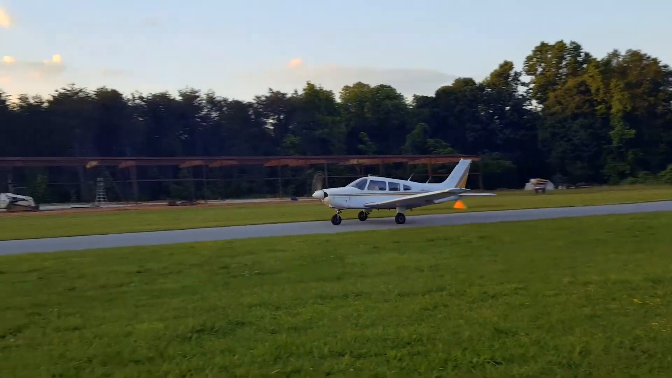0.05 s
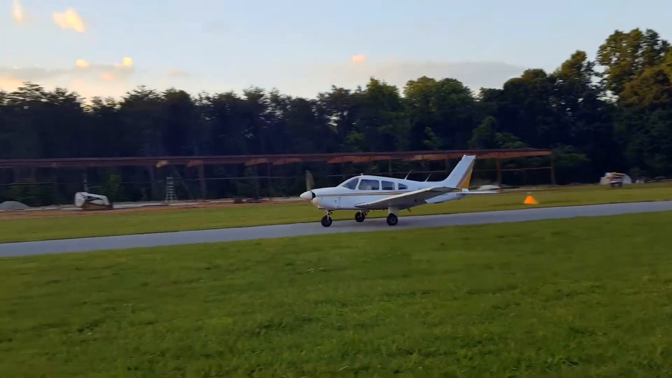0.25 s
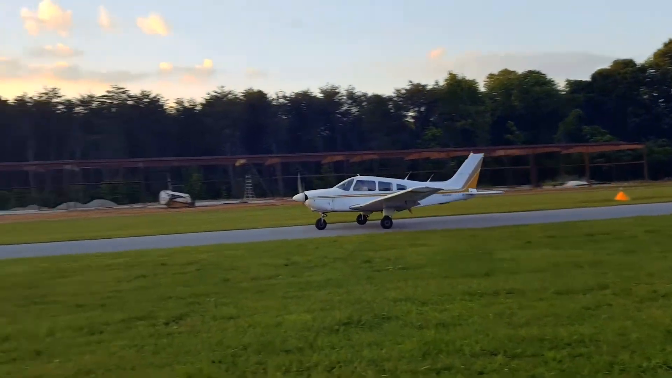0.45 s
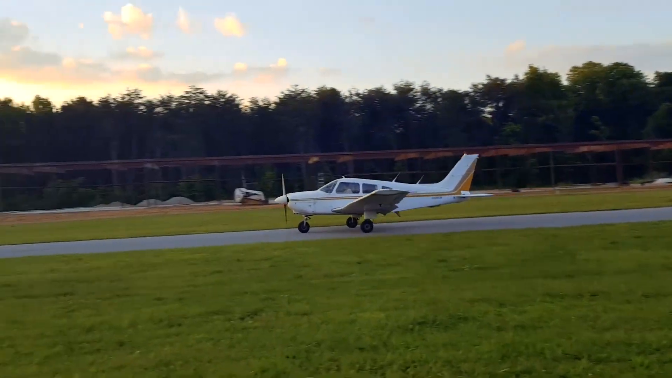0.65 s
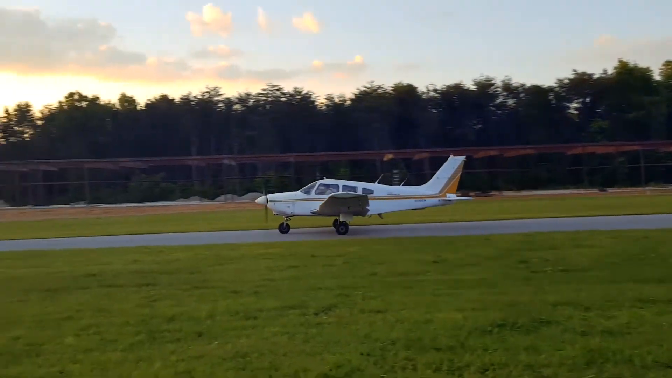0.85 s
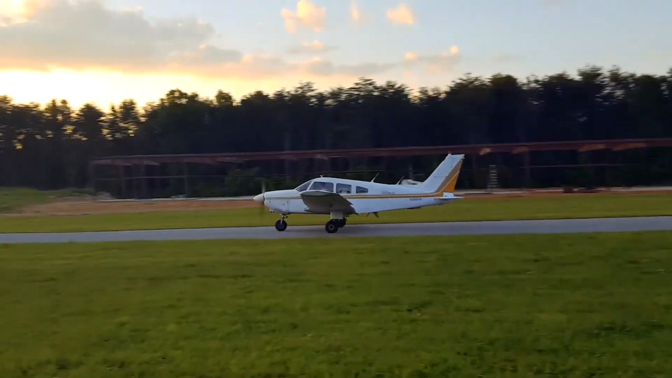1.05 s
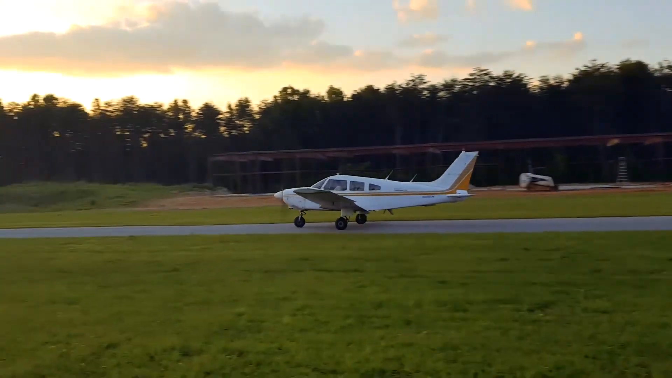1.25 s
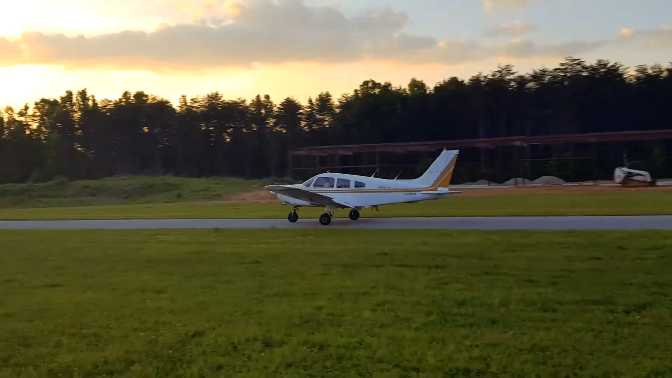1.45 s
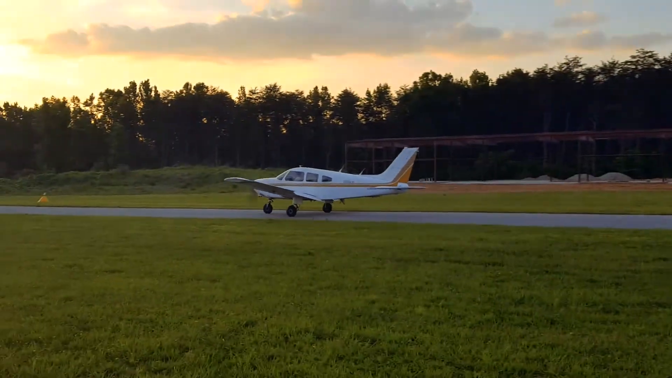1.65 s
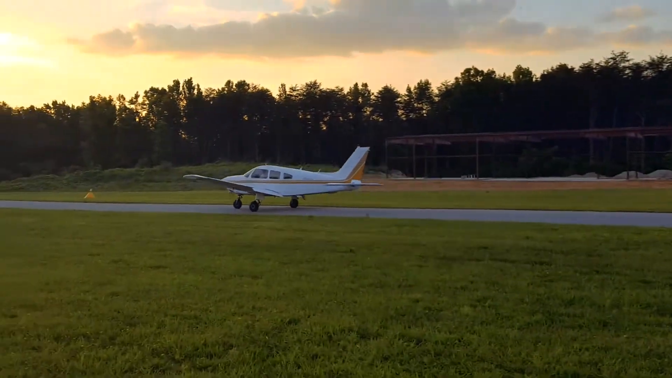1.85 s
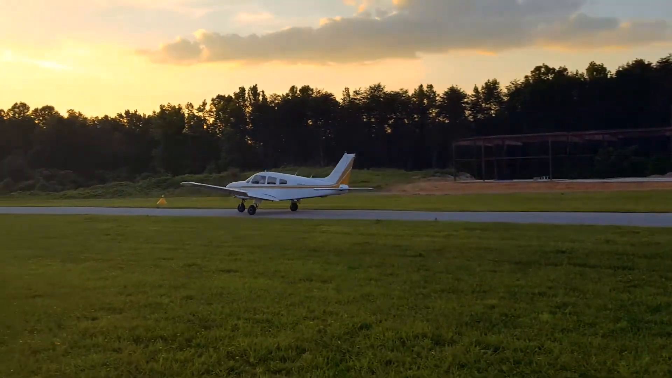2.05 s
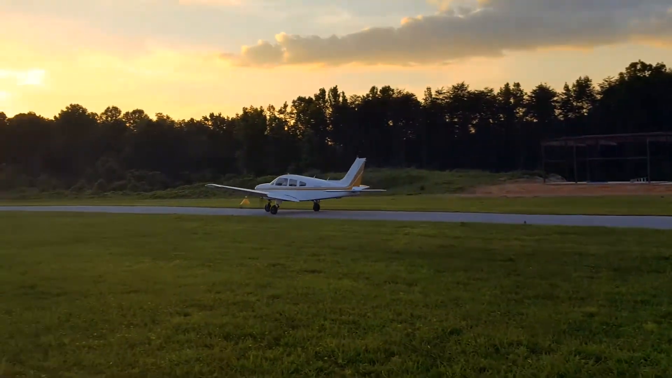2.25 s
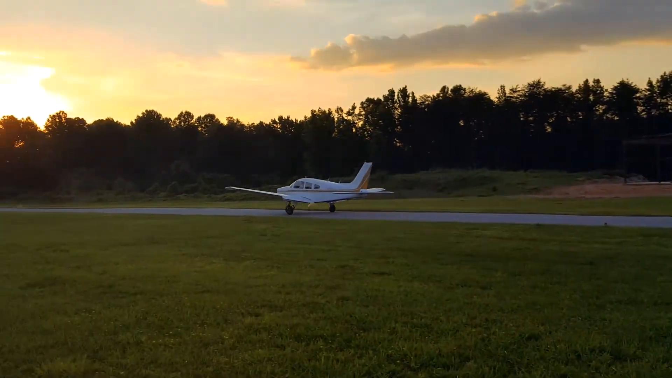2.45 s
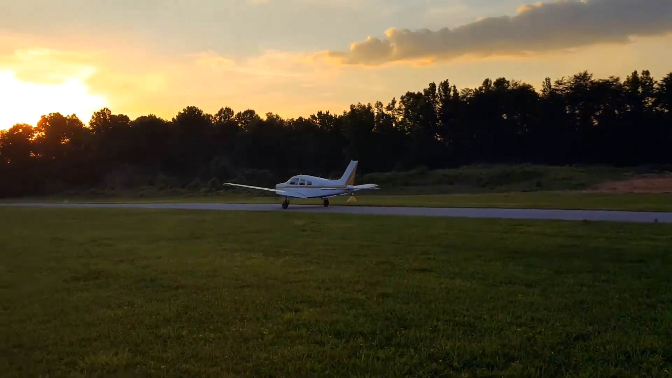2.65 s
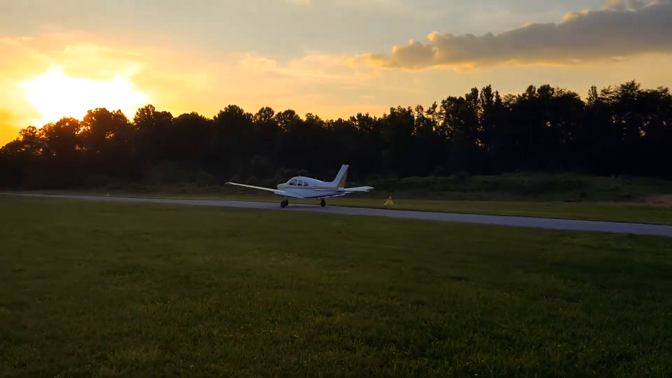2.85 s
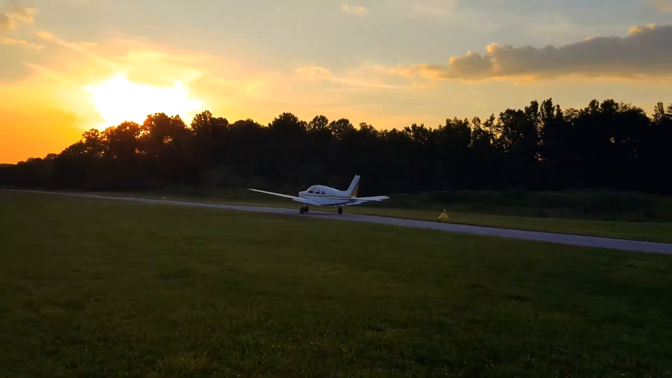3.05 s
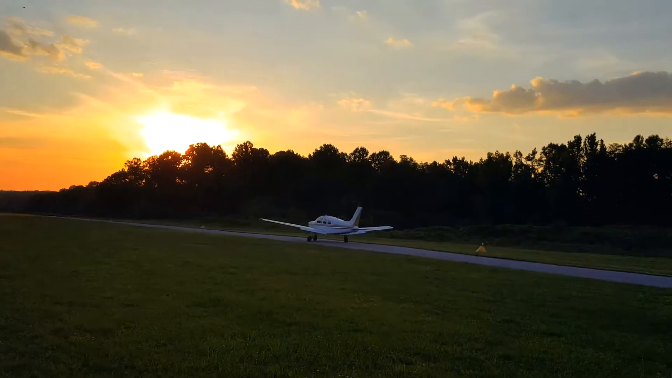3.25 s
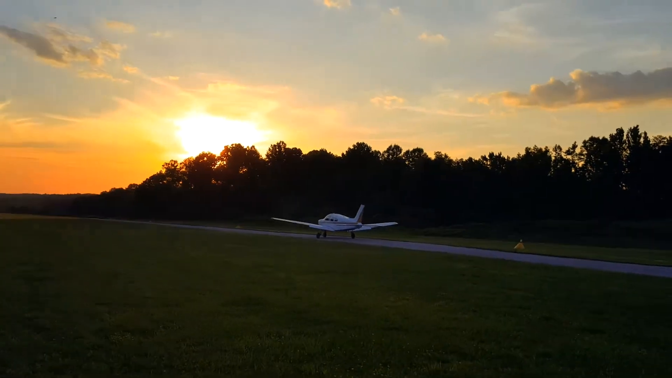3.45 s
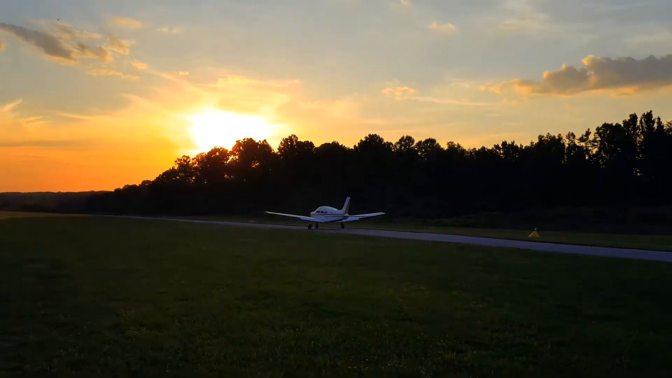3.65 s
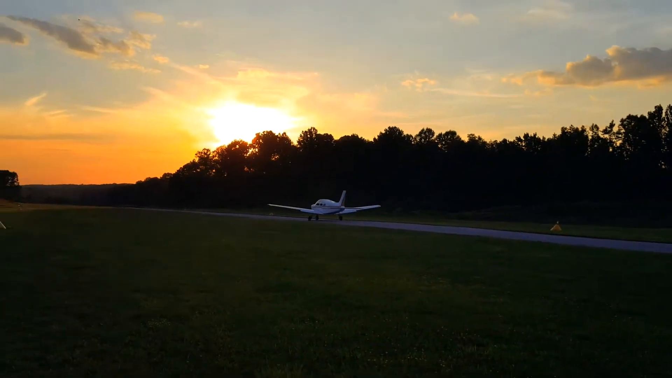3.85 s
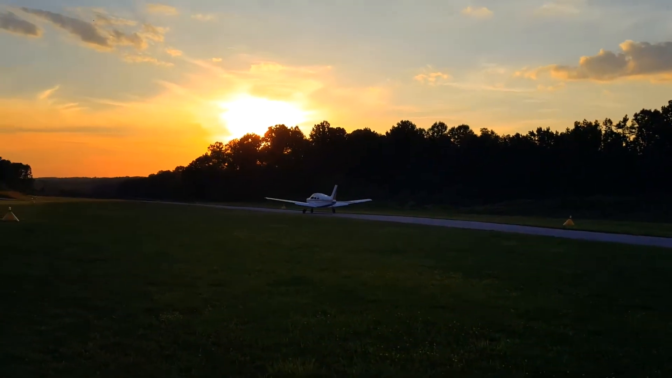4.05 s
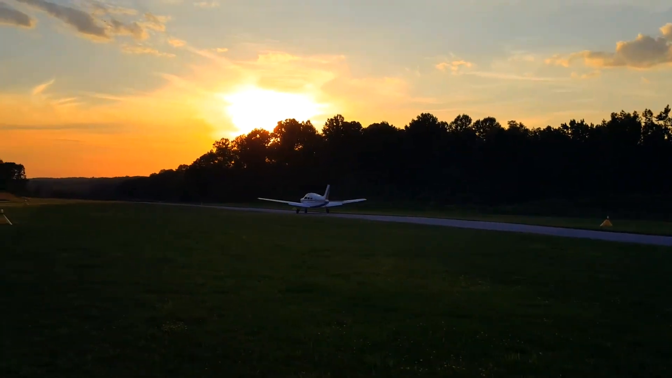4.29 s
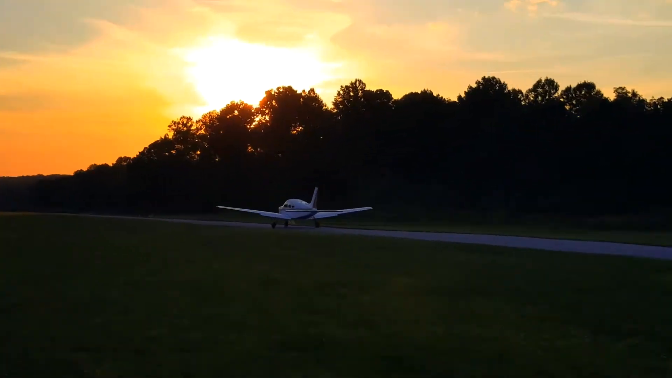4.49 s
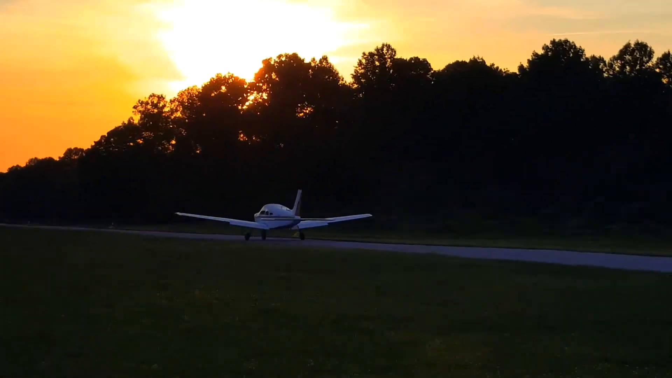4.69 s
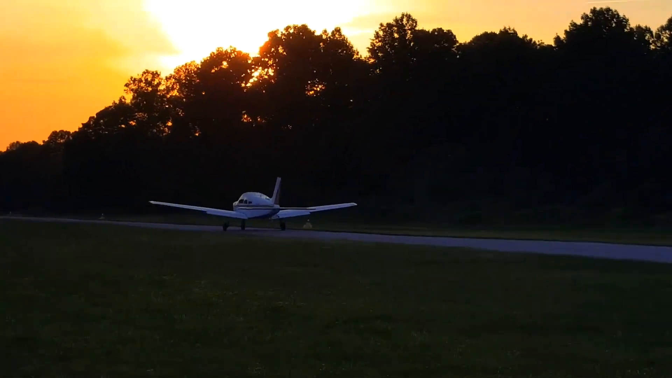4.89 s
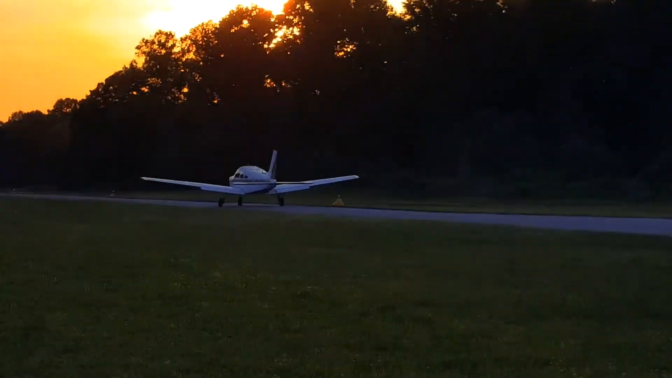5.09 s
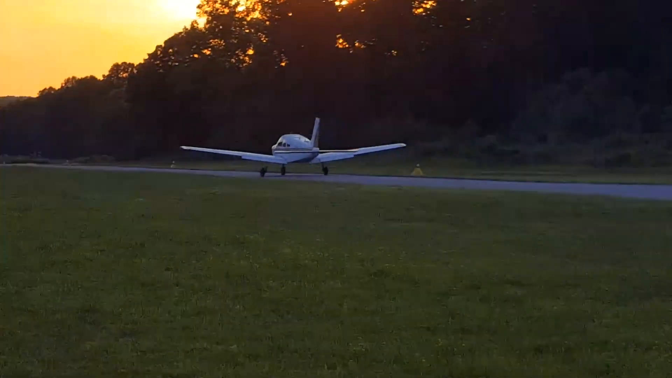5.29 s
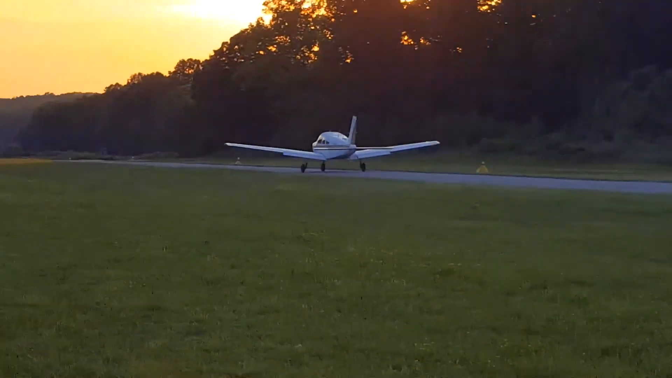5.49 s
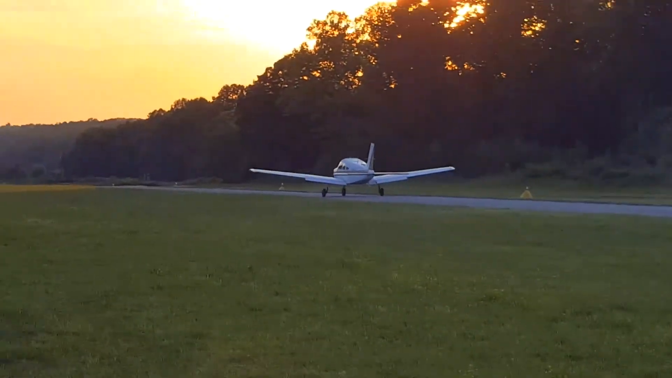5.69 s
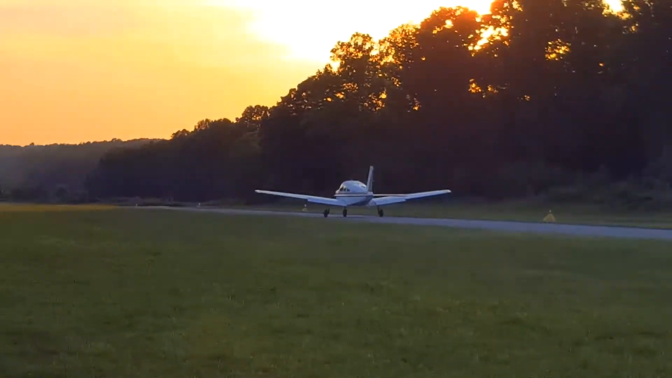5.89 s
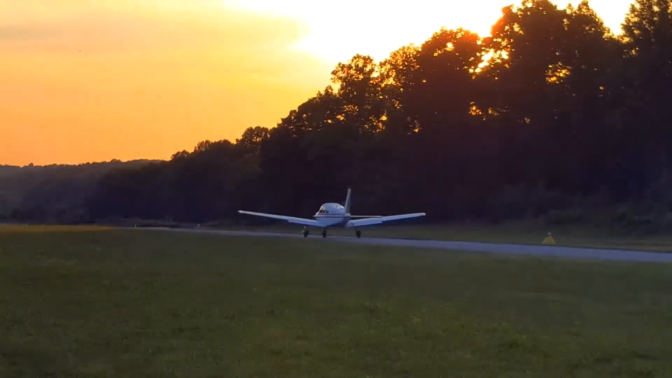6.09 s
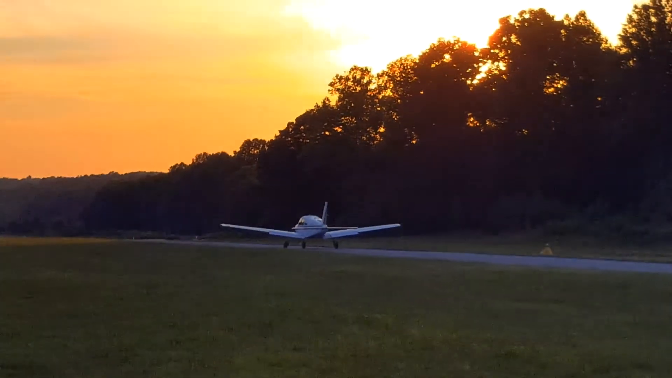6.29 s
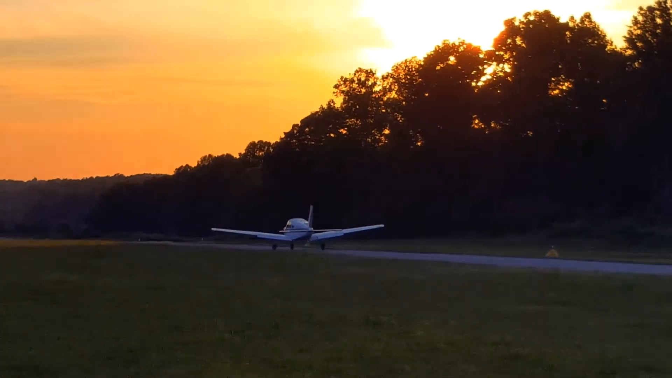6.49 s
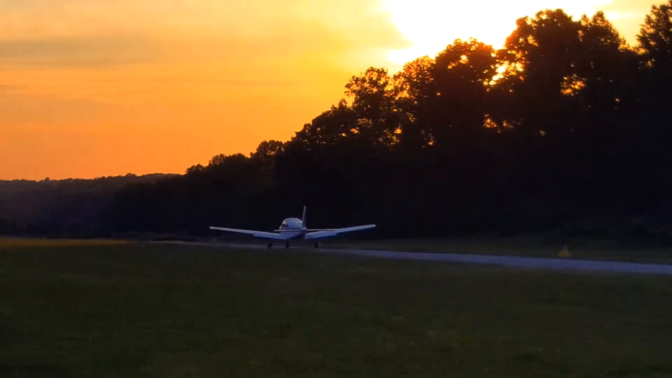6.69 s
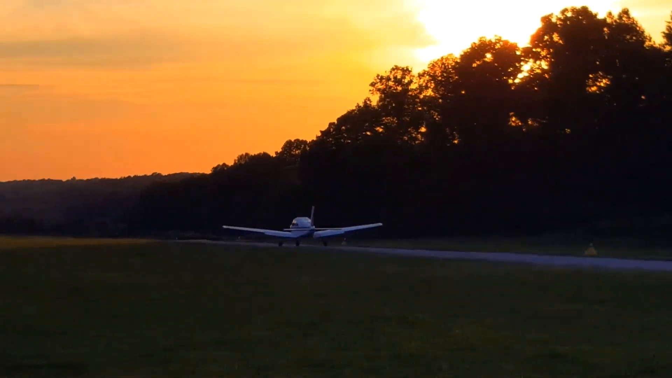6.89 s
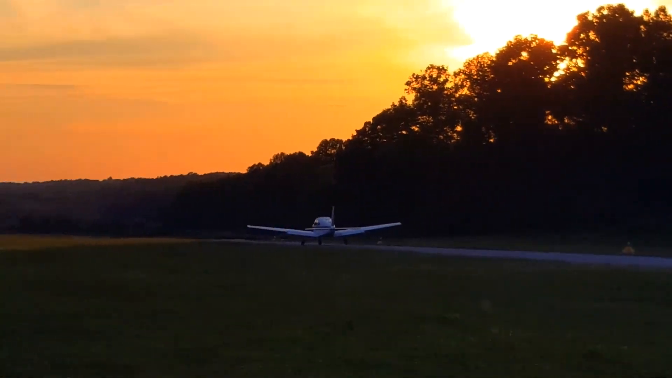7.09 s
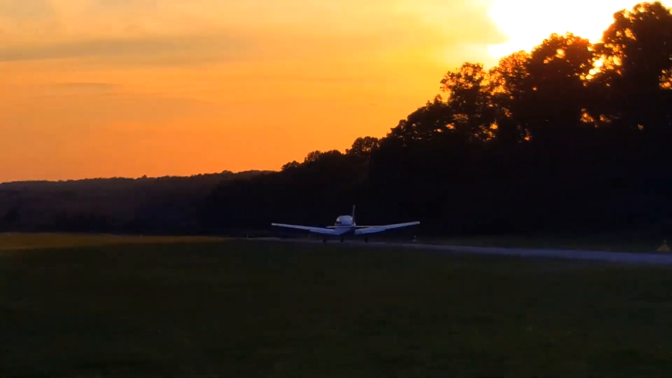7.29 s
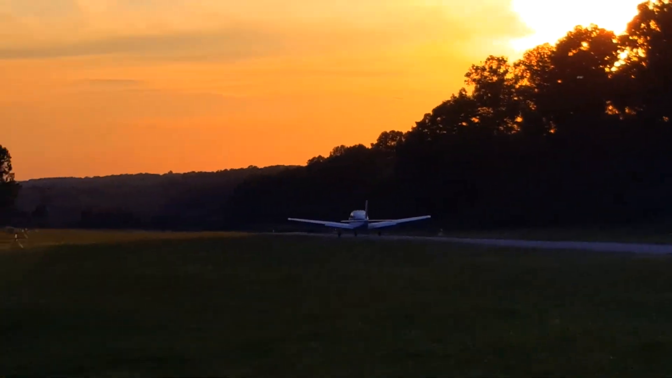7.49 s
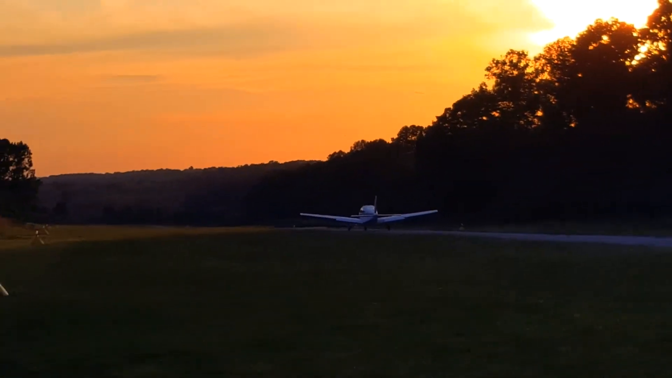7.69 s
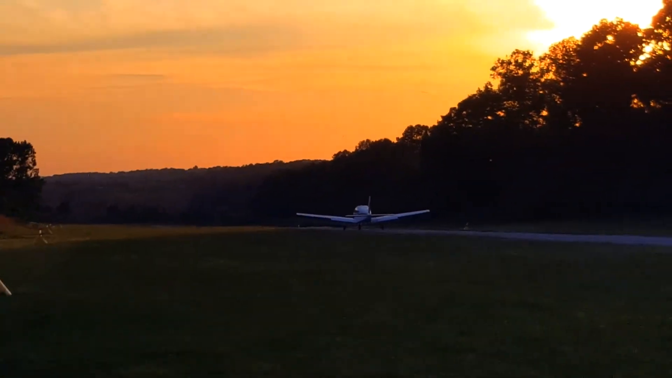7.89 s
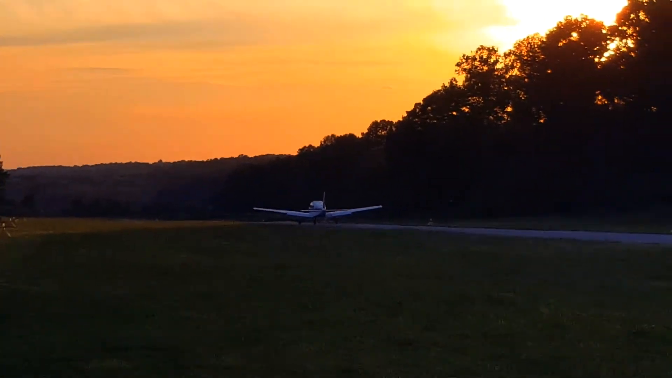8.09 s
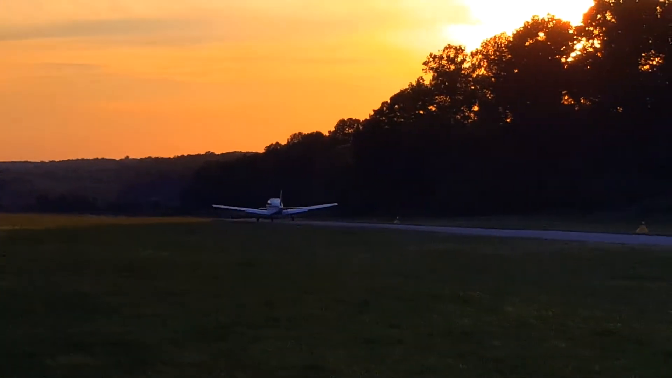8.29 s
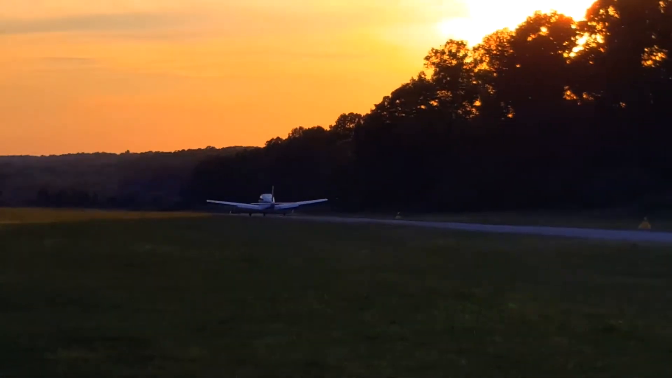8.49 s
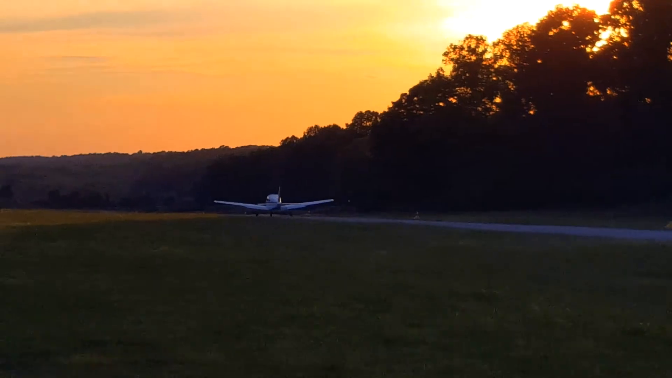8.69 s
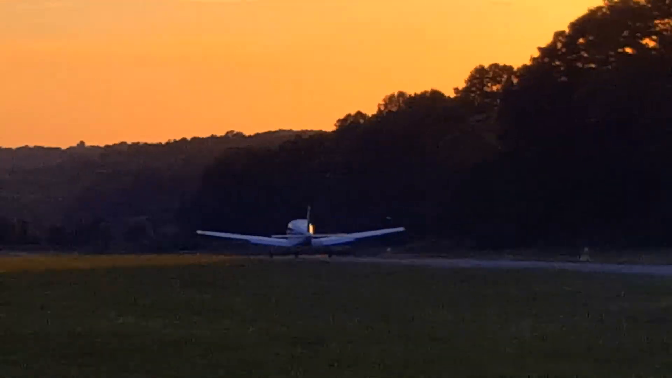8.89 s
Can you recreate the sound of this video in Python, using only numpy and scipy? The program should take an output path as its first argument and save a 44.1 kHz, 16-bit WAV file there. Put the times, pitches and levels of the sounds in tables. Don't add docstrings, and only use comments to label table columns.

```python
import sys
import numpy as np
from scipy import signal
from scipy.fft import rfft, irfft, next_fast_len
from scipy.io import wavfile

SR = 44100
rng = np.random.default_rng(int(sys.argv[2]) if len(sys.argv) > 2 else 0)


def transcribe(signal):
    frames = np.atleast_2d(signal).T
    limited = np.clip(frames, -1, 1)
    pcm = np.round(limited * 32767).astype(np.int16)
    wavfile.write(sys.argv[1], SR, pcm)


def invert_db(level):
    return 10 ** (np.asarray(level, dtype=float) / 20)


N = 394254

# freq_hz, side_minus_mid_db
SIDE_SPECTRUM = [(60, -33), (110, -1.5), (200, -12), (380, -17), (700, -14.5), (1290, -13.5), (2380, -9.5),
                 (4400, -8.5), (8120, -7.5), (15000, -5.5)]
# start_s, level_db
WOODS_ROAR = [(0, -32), (.4, -32), (1, -32.5), (1.5, -32.5), (2.6, -36), (3.8, -30), (4.4, -34.5), (5, -37),
              (6.3, -47), (7, -48.5), (7.7, -55), (8.94, -54.5)]


def rms_one(x):
    return x / np.sqrt(np.mean(x ** 2) + 1e-20)


def to_db(gain):
    return 20 * np.log10(gain + 1e-6)


def in_time(rows):
    s, *columns = np.transpose(rows)
    return [np.interp(np.arange(N) / SR, s, c) for c in columns]


def at_hz(points, hz):
    point_hz, value = np.transpose(points)
    return np.interp(np.log(hz), np.log(point_hz), value)


def axis():
    size = next_fast_len(N)
    return size, np.maximum(np.arange(size // 2 + 1) * SR / size, 1)


def drift(rate_hz):
    r = np.exp(-80 * np.pi * rate_hz / SR)
    slow = signal.lfilter([1], [1, -2 * r, r * r], rng.standard_normal(N // 40 + 2002))
    slow = rms_one(slow[2000:])
    return np.interp(np.arange(N) / 40, np.arange(len(slow)), slow)


def bell(t, centre, width):
    return np.exp(-((t - centre) / width) ** 2 / 2)


def ridge(t, peak_db, centre_s, rise, fall):
    round_s = 0.24
    late_s = t - centre_s
    return peak_db - np.where(late_s < 0, rise, fall) * (np.hypot(late_s, round_s) - round_s)


def to_ports(mid, side, hz):
    # freq_hz, left_minus_right_db
    port_lean = [(60, -0.5), (110, 10), (200, -6), (380, -1.5), (700, -2.5), (1290, 0.5), (2380, -3),
                 (4400, 1.5), (8120, -4), (15000, -0.5)]
    lean = invert_db(at_hz(port_lean, hz) / 2)
    return np.array([(mid + side) * lean, (mid - side) / lean])


def order(k, firings, level_db):
    phase_rad = -1.7 - .36 * k
    return np.sqrt(2) * invert_db(level_db) * np.cos(2 * np.pi * k * firings + phase_rad)


def direct_levels(t):
    # start_s, level_db
    firing_tone = [(0, -37), (.15, -30), (.4, -21.5), (1, -19.5), (1.6, -16.5), (2.1, -15), (2.6, -15.5),
                   (3.3, -17), (4.3, -25), (5.1, -23.5), (6, -28), (7.1, -25.5), (7.8, -31.5), (8.94, -38)]
    # peak_db, peak_s, rise_db_per_s, fall_db_per_s, astern_under_firing_db
    disc_sweep = [
        (-14.5, 1.16, 2, 12.5, -9),
        (-22, 1.29, 4, 25, -26),
        (-28, 0.84, 30, 11.5, -38.5),
        (-32.5, 1.025, 16.5, 66, -39),
    ]
    # order, centre_s, width_s, level_db
    order_swells = [
        (3, 4.15, .3, -37),
        (3, 4.9, .35, -43),
        (5, 1.45, .15, -45),
        (4, 3.85, .45, -38),
        (5, 3.2, .2, -50),
        (4, 5.5, .4, -49),
    ]
    first_db, = in_time(firing_tone)
    levels = [first_db]
    for k, (*sweep, astern_db) in enumerate(disc_sweep, 2):
        passed = (t > sweep[1]) * (1 - bell(t, sweep[1], 0.98))
        lifted_db = 10 * np.clip((t - 6.84) / 1.5, 0, 1) * (k == 2)
        astern = invert_db(first_db + astern_db - lifted_db) * passed
        order_bumps = sum(invert_db(db) * bell(t, s, width) for n, s, width, db in order_swells if n == k)
        levels.append(to_db(invert_db(ridge(t, *sweep)) + astern + order_bumps))
    return levels


def direct_tone(firings):
    t = np.arange(N) / SR
    levels = direct_levels(t)
    sixth_db = np.minimum(levels[4] - 2, -43) - 14 * bell(t, 1.4, .15)
    return sum(order(k, firings, db) for k, db in enumerate(levels + [sixth_db], 1))


def echo_levels(t):
    # centre_s, width_s, order_1_db, order_2_db
    stands = [(2.6, 0.62, -29, -36), (3.42, 0.2, -18, -21), (3.92, 0.24, -17.5, -19),
              (4.4, 0.26, -19.5, -37), (4.88, 0.24, -27.5, -21), (5.32, 0.15, -34, -32.5),
              (5.72, 0.26, -19.5, -31), (6.308, 0.14, -26.5, -33.5), (6.68, 0.1, -39, -40),
              (6.94, 0.096, -28, -47), (7.4, 0.15, -27.5, -42), (7.72, 0.13, -63, -41.5),
              (8.06, 0.19, -29.5, -46), (8.6, 0.18, -47, -43), (8.9, 0.079, -47, -50)]
    # peak_db, peak_s, rise_db_per_s, fall_db_per_s
    third_ridge = (-36, 3.5, 30, 12.5)
    humps = np.array([bell(t, s, width) for s, width, *_ in stands])
    first_db, second_db = to_db(invert_db(np.array(stands)[:, 2:].T) @ humps)
    third_db = ridge(t, *third_ridge)
    return [first_db, second_db, third_db, third_db - 5.5]


def tree_echo(firings, leads):
    levels = echo_levels(np.arange(N) / SR)
    return sum(order(k + 1, firings + leads[min(k, 1)], db) for k, db in enumerate(levels))


def woods_swing():
    return in_time(WOODS_ROAR)[0] + 39


def odd_turns(k):
    # order, centre_s, width_s, level_db
    turn_list = [
        (1.5, 5.26, 0.7, -9),
        (1.5, 1.9, .2, -3),
        (1.5, 7.8, .3, 3),
        (2.5, 4.6, .4, 6),
        (2.5, 2.8, 0.19, 6),
        (2.5, 1.7, 0.27, -6),
        (.5, 5.4, 1.3, -9),
        (3.25, 8, 1.6, -9),
        (2.75, 8.2, 1.2, -6),
    ]
    t = np.arange(N) / SR
    return sum(db * bell(t, s, width) for n, s, width, db in turn_list if abs(n - k) < .1)


def imbalance_orders(firings):
    # order, level_db
    uneven = [(0.502, -13), (1.247, -4), (1.5, 2), (1.748, -4.5), (2.25, 1.5), (2.5, -3), (2.75, -5.5),
              (3.25, -4.5), (3.499, -39)]
    t = np.arange(N) / SR
    level_db = -39 + 0.68 * woods_swing() - 7.5 / (1 + np.exp((t - 2.3) / 0.08))
    out = 0
    for k, db in uneven:
        sway = 1 if round(4 * k) % 2 == 0 else drift(3.0)
        order_db = level_db + db + odd_turns(k) + 2.0 * drift(5.0)
        out = out + sway * order(k, firings + rng.random(), order_db)
    return out


def upper_orders(firings):
    # order, level_db
    upper = [(7, 2), (8, 2), (9, 1), (10, -3), (11, -4)]
    level_db = -46 - 31 * np.maximum(np.arange(N) / SR - 0.95, 0)
    return sum(order(k, firings, level_db + db + 1.2 * drift(2.5)) for k, db in upper)


def scattered_tone(firings):
    t = np.arange(N) / SR
    shade_db = 9 / (1 + np.exp((t - 2.5) / .3))
    level_db = -39 + woods_swing() - shade_db + 7 * bell(t, 1.35, .15)
    ahead = firings + 3.5 * t
    out = 0
    for k, db in ((2, -7.), (3, -10.), (4, -18.)):
        out = out + drift(1.2 * k) * order(k, ahead, level_db + db)
        out = out + drift(2.3 * k) * order(k, ahead + 0.096 / k, level_db + db)
    return out


def tone(firings, leads):
    # freq_hz, left_minus_right_db
    low_lean = [(75, -.55), (150, -1.1), (230, -1.7)]
    out = direct_tone(firings) + tree_echo(firings, leads) + imbalance_orders(firings)
    out = out + upper_orders(firings) + scattered_tone(firings)
    size, hz = axis()
    port_turn_rad = .05
    turn = invert_db(at_hz(low_lean, hz) / 2) * np.exp(-1j * port_turn_rad)
    return irfft(rfft(out, size) * [turn, 1 / turn] * invert_db(0.7), size)[:, :N]


def bursts(firings, uneven_db, standouts=()):
    count = np.floor(firings + .5).astype(int)
    chance_db = uneven_db * rng.standard_normal(1000)
    for s, db in standouts:
        chance_db[count[round(s * SR)]] = 1.04 * db / 2
    cylinder_db = np.array([0, .3, -.9, .7])
    strength_db = cylinder_db[count % 4] + chance_db[count % 1000]
    angle = 2 * np.pi * firings + .35
    hump = .5 + .5 * np.cos(angle - .4 * (1 - np.cos(angle)))
    return hump, invert_db(2 * strength_db)


def staged_noise():
    # freq_hz, level_db_per_hz
    abeam = [(330, -30), (480, -14), (650, -1.5), (1550, 4), (2330, 5), (3130, -9.5), (4190, -8),
             (5000, -15.5), (5800, -29), (6900, -12.5), (8300, -23.5), (10500, -37), (12300, -38),
             (13300, -41), (15900, -35)]
    quartering = [(330, -30), (480, -8.5), (643, 0.5), (888, -4), (1740, 0), (2450, -1), (3100, -12),
                  (3600, -11), (4070, -12.5), (4600, -15.5), (5100, -19), (6300, -23.5), (7760, -2.5),
                  (9500, -31.5), (12300, -34.5), (13300, -33), (15900, -28)]
    astern = [(330, -36), (480, -11), (862, -9), (1720, 2.5), (2330, 4.5), (3080, -5), (4260, 0),
              (5960, -21.5), (7530, -5), (8100, -17), (8850, -34.5), (10900, -35), (11600, -47),
              (12600, -54), (14300, -45), (15900, -47)]
    far_off = [(330, -26), (480, -18.5), (700, -13.5), (1280, -10.5), (1550, -2.5), (2300, 4), (3130, -6.5),
               (4100, -0.5), (5600, -12), (6500, -15.5), (7600, -15), (9600, -36.5), (11500, -48),
               (15900, -53)]
    lift_off = [(330, -15.5), (480, -16), (700, -11), (1280, -8), (1700, -1), (2300, -1.5), (3130, -8),
                (4100, -5), (5300, -15.5), (6400, -31), (7600, -18.5), (8800, -42.5), (11500, -52),
                (15900, -56)]
    # start_s, colour_in_use (0-4)
    stage_path = [(0, 0), (1.5, 0), (1.75, 1), (3.2, 1), (3.42, 2), (5.62, 2), (5.76, 3), (7.4, 3),
                  (8.1, 4), (8.94, 4)]
    # low_hz, high_hz
    band_edges = [(450, 1200), (1200, 3100), (3100, 5900), (6500, 8800)]
    size, hz = axis()
    white = rfft(rng.standard_normal((2, size)))
    stage = np.clip(in_time(stage_path)[0], 0, 4)
    out, base_db = 0, 0
    for k, points in enumerate((abeam, quartering, astern, far_off, lift_off)):
        share = np.clip(1 - abs(stage - k), 0, 1)
        gain = invert_db(at_hz(points, hz))
        out = out + share * irfft(white * gain, size)[:, :N]
        power = [2 * np.sum(gain[(hz > low) & (hz < high)] ** 2) / size for low, high in band_edges]
        base_db = base_db + share * 10 * np.log10(power)[:, None]
    return rfft(out, size), base_db


def swells(hz):
    # centre_s, width_s, freq_hz, level_db
    swell_list = [(0, 0.18, 7000, -6), (0, 0.49, 14000, 3.5), (0.248, 0.44, 3889, 4), (.5, 0.68, 1650, 5),
                  (1.5, 0.2, 8000, -6), (2.2, 0.36, 2180, 5), (2.4, 0.09, 3889, 4), (2.5, 0.63, 720, -6),
                  (3.25, 0.11, 7500, -3.5), (5.25, .1, 4100, -0.5), (3.5, 0.19, 760, 3.5),
                  (3.6, .5, 2160, -1), (3.4, 0.32, 3900, 1), (3.6, 0.072, 6944, 3), (4.55, 0.19, 2400, 4),
                  (4.8, 0.3, 7500, 2.5), (5.02, 0.1, 1600, 6.5), (5.1, 0.31, 770, -4.5),
                  (5.35, 0.082, 2580, 5), (5.6, 0.13, 6650, 7), (2.1, 0.23, 3800, -5),
                  (6.3, .35, 810, -6.5), (3.7, 0.24, 2770, -6), (7, 0.17, 2150, 4), (8.17, 0.18, 7100, 7.5),
                  (8.602, .4, 14000, -6)]
    # centre_s,
    # half_length_s, freq_hz, level_db
    flat_changes = [(3.25, .18, 9900, 4), (3.3, .16, 14500, -3), (3.75, .25, 13000, 5), (4.7, .45, 12500, -2),
                    (5.47, .2, 14000, -5), (5.9, .22, 12400, 9), (5.9, .22, 14200, 6), (8.6, .45, 10200, -7),
                    (1.5, .75, 12200, -1), (3.6, .17, 9400, -3), (3.23, .14, 7600, -6), (1.1, .55, 4000, -2),
                    (2.9, 0.39, 4050, -0.5), (3.5, 0.13, 4800, -1.5), (5.8, 0.72, 2200, 1.5),
                  (1.6, .15, 1500, 0), (3.25, 0.19, 1800, -3), (1.12, 0.18, 6800, -1.5),
                  (3.1, 0.17, 1700, 5), (2.1, 0.26, 7700, 0), (5.9, 0.047, 3200, 3), (4.7, 0.12, 2250, 0.5)]
    t = np.arange(0, N / SR + .02, .01)
    total_db = 0
    for s, width, at, db in swell_list:
        total_db = total_db + db * bell(t, s, width) * bell(np.log2(hz / at), 0, .25)
    for s, half, at, db in flat_changes:
        total_db = total_db + db * np.exp(-((t - s) / half) ** 4) * bell(np.log2(hz / at), 0, .18)
    return np.interp(np.arange(N) / SR, t, total_db)


def rasp_changes(base_db):
    # start_s, level_db
    range_path = [(0, 4), (.15, 1.5), (.6, -1), (2.2, 2), (2.9, -0.5), (3.3, 0), (4.1, -1.5), (4.5, -1),
                  (5.2, -3.5), (5.7, -9), (6.3, -9), (7, -13), (7.6, -14), (8.3, -16.5), (8.94, -17.5)]
    band_db, follows = [-33, -26.5, -30.5, -34], [.6, .95, 1.05, 1.45]
    change_db = np.c_[band_db] + np.c_[follows] * in_time(range_path)[0] - base_db
    return np.vstack([change_db, change_db[-1] + 5.5])


def rasp(firings, lead):
    # start_s, steady_share (0-1), echo_share (0-1), side_db
    rasp_form = [(0, 0.07, 0.12, 7), (1.6, 0.33, 0, 3.5), (2.1, 0.29, 0.02, 1.5), (2.7, 0.4, 0.03, 4),
                 (3.35, 0.75, 0, 8), (4.2, 0.56, 0.33, 6.5), (5, 0.61, 0.04, 5), (5.6, 0.7, 0.02, 8.5),
                 (8.94, 0.77, 0.06, 9)]
    # start_s, level_db
    standout_list = [(0.178, 2.3), (0.203, 2.4), (0.216, -3.3), (0.241, -3.1), (0.279, -4.2), (0.367, -4.3),
                     (0.632, 3.4), (0.683, 2.4), (0.747, 2.3), (0.76, 2.8), (0.823, -4.3), (0.977, 2.5),
                     (1.067, 3.0), (1.093, 3.9), (1.119, 3.2), (1.158, -3.1), (1.249, 2.4), (1.314, -3.9),
                     (1.366, 2.9), (1.509, 2.3), (1.614, 2.8), (1.706, -3.7), (1.812, -3.3), (1.97, -3.1),
                     (2.209, 3.0), (2.355, 3.0), (2.409, 4.1), (2.729, 3.7), (2.837, 2.7), (2.984, 2.3),
                     (3.038, -4.5), (3.065, 4.0), (3.348, 2.7), (3.658, -3.2), (3.861, 3.1), (3.929, 2.6),
                     (4.091, 2.7), (4.172, 2.5), (4.281, 2.7), (4.403, 2.5), (4.498, -4.0), (4.512, 3.8),
                     (4.525, 2.6), (4.621, 2.6), (5.043, 3.0), (5.302, 6.3), (5.316, 3.1), (5.33, -3.3),
                     (5.466, 2.5), (5.575, -3.2)]
    band_hz = [700, 2000, 4200, 7500, 13000]
    # freq_hz, share (0-1) of the side that is the mid turned in phase
    tied_share = [(400, 1), (2000, 0.85), (8000, 0.53), (16000, .45)]
    steady, echoed, side_db = in_time(rasp_form)
    steady, echoed = np.clip(steady, 0, 1), np.clip(echoed, 0, 1)
    hump, power = bursts(firings, .35, standout_list)
    late_hump, late_power = bursts(firings + lead, 1.4)
    size, hz = axis()
    noise, base_db = staged_noise()
    change_db = rasp_changes(base_db)
    noise = np.vstack([noise, -1j * noise[:1]])
    octave = np.log2(hz / 400)
    out, shared = 0, drift(1.9)
    for k in range(17):
        centre_hz = 400 * 2 ** (k / 3)
        window = np.cos(np.pi / 2 * np.clip(3 * octave - k, -1, 1)) ** 2
        mid, loose, turned = irfft(noise * window, size)[:, :N]

        place = np.interp(np.log(centre_hz), np.log(band_hz), range(5))
        low = min(int(place), 3)
        level_db = change_db[low] * (low + 1 - place) + change_db[low + 1] * (place - low)
        level_db = level_db + swells(centre_hz)

        sharp = 1.9 + .21 * k
        direct = power * hump ** sharp
        pulse = (1 - echoed) * direct + echoed * late_power * late_hump ** sharp
        gate = np.sqrt(steady ** 2 + (1 - steady ** 2) * pulse / np.mean(direct))
        flutter_db = 0.36 * shared + 0.69 * drift(4.1) + 0.96 * drift(53)
        gain = gate * invert_db(level_db + flutter_db)

        tied = np.clip(at_hz(tied_share, centre_hz), 0, 1)
        swing_rad = 0.4 * drift(0.38)
        side = tied * (turned * np.cos(swing_rad) + 0.19 * mid * np.sin(swing_rad))
        side = side + np.sqrt(1 - tied ** 2) * loose
        side_gain = gain * invert_db(at_hz(SIDE_SPECTRUM, centre_hz) + side_db)
        out = out + to_ports(mid * gain, side * side_gain, centre_hz)
    return out


def rumble():
    # freq_hz, level_db_per_hz
    roar_spectrum = [(18, -38), (30, -10), (50, -7.5), (100, -7.5), (190, -6), (270, -8), (350, -12.5),
                     (430, -19.5), (600, -43)]
    size, hz = axis()
    side_gain = invert_db(at_hz(SIDE_SPECTRUM, hz) + 6)
    colour = invert_db(at_hz(roar_spectrum, hz)) * [np.ones_like(hz), side_gain]
    mid, side = irfft(rfft(rng.standard_normal((2, size))) * colour, size)[:, :N]
    level_db = in_time(WOODS_ROAR)[0] + 1.5 * drift(8.6)
    return invert_db(level_db) * rms_one(to_ports(mid, side, 166))


def wall_ahead():
    # start_s, firing_rate_hz
    raised_rate = [(0, 82.6), (1, 82), (1.6, 80.9), (2.4, 80), (3.3, 80.3), (4, 80.8), (6, 80.6),
                   (8.94, 80)]
    # order, centre_s, width_s, level_db
    raised_orders = [
        (10, 1, .6, -45),
        (9, 1.75, .5, -44.5),
        (8, 2.1, .45, -43.5),
        (7, 2.6, .6, -45),
        (6, 3.4, .35, -45),
        (5, 5.3, 1.7, -53),
        (4, 7.9, 1.0, -62),
    ]
    t = np.arange(N) / SR
    firings = np.cumsum(in_time(raised_rate)[0]) / SR
    return sum(bell(t, s, width) * order(k, firings, db + 4 * drift(9)) for k, s, width, db in raised_orders)


def tick():
    # start_s, peak_db
    knocks = [
        (8.539, -19.5),
    ]
    # freq_hz, level_db, t60_s
    shell_modes = [
        (1250, 3, .005),
        (2500, 0, .002),
        (4200, -2, .002),
    ]
    click, out = np.full(N, 1e-18), 0
    for s, db in knocks:
        click[round(s * SR)] = invert_db(db - 1)
    click = signal.sosfilt(signal.butter(4, 5500, fs=SR, output="sos"), click)
    for hz, db, t60_s in shell_modes:
        r, w = invert_db(-60 / (t60_s * SR)), 2 * np.pi * hz / SR
        ring = signal.lfilter([0, np.sin(w)], [1, -2 * r * np.cos(w), r * r], click)
        out = out + invert_db(db) * ring
    return out * invert_db(np.array([[1.5], [-1.5]]))


def scene():
    # start_s, firing_rate_hz
    rate_path = [(0, 79.79), (.3, 79.47), (.6, 78.88), (.9, 77.98), (1.2, 77.13), (1.5, 76.39),
                 (1.8, 75.84), (2.1, 75.37), (2.4, 75.01), (3, 74.38), (3.6, 74.06), (4.5, 73.56),
                 (5.1, 73.27), (5.7, 73.22), (7.2, 72.77), (8.4, 72.52), (8.94, 72.51)]
    # start_s, order_1_lead_firings, higher_order_lead_firings
    echo_leads = [(1.5, 1.5, 3.02), (2.2, 3.25, 4.57), (2.5, 3.89, 5.4), (3.3, 5.98, 7.24),
                  (3.5, 6.41, 7.72), (4.65, 9.32, 10.6), (5, 10.25, 11.4), (5.24, 10.8, 11.94),
                  (6.04, 12.24, 13.43), (6.2, 12.21, 13.71), (6.44, 12.7, 14.14), (6.8, 13.26, 15.05),
                  (7.04, 13.91, 15.86), (7.18, 14.78, 16.15), (7.55, 15.43, 16.68), (7.8, 16.43, 17.4),
                  (8.4, 17.97, 19.7), (8.94, 19.7, 20.96)]
    firings = np.cumsum(in_time(rate_path)[0]) / SR + .81
    leads = in_time(echo_leads)
    return tone(firings, leads) + rasp(firings, leads[0]) + rumble() + wall_ahead() + tick()


def notch(x, path, half_width_hz):
    hz, depth = in_time(path)
    turn = np.exp(2j * np.pi * np.cumsum(hz) / SR)
    r = np.exp(-2 * np.pi * half_width_hz / SR)
    picked = turn * signal.lfilter([1 - r], [1, -r], x / turn)
    return x - 2 * depth * picked.real


def low_pass(x):
    return signal.sosfilt(signal.butter(12, 16920, fs=SR, output="sos"), x)


def record(dry):
    # start_s, centre_hz, depth (0-1)
    low_notch = [(0, 3300, .3), (1.6, 3650, .3), (1.85, 3600, .8), (2.5, 3280, .85), (3.4, 3200, .85),
                 (3.6, 3050, .5), (4.8, 3100, .75), (5.6, 3000, .6), (8.94, 3100, .5)]
    high_notch = [(0, 10200, .6), (.5, 10800, .5), (1, 11800, .7), (1.7, 12200, .75), (2.3, 12800, .6),
                  (3, 12200, .5), (3.5, 11300, .6), (5.6, 11600, .6), (8.94, 11500, .7)]
    shaded = notch(notch(dry, low_notch, 110), high_notch, 450)
    rounded = shaded / (1 + abs(shaded) ** 6) ** (1 / 6)
    top_cut = signal.ellip(12, .5, 55, 15800, fs=SR, output="sos")
    return low_pass(signal.sosfilt(top_cut, rounded))


dry = scene()
out = record(dry)
transcribe(out)
```